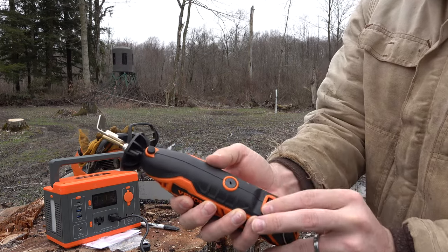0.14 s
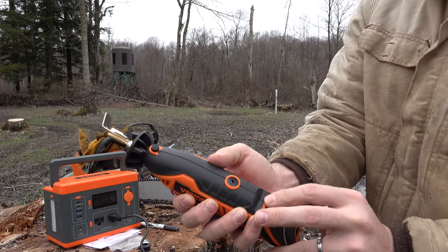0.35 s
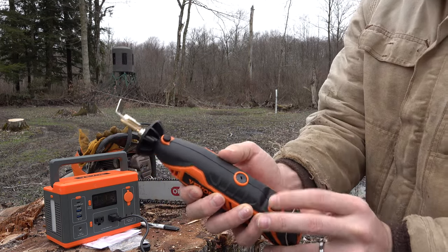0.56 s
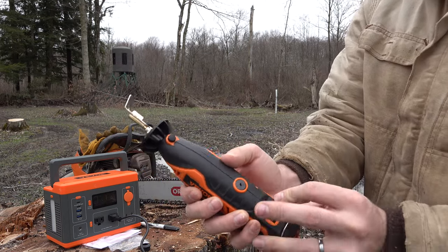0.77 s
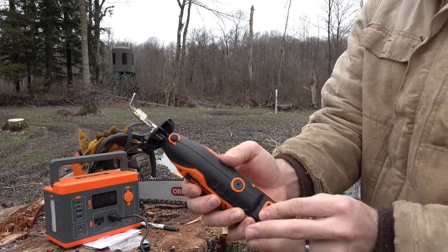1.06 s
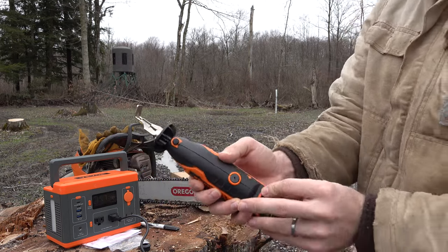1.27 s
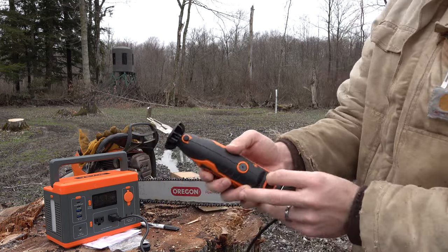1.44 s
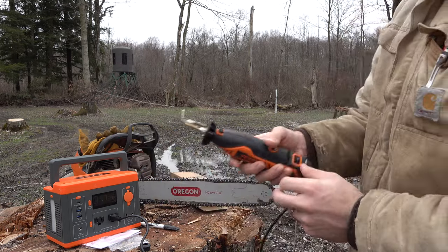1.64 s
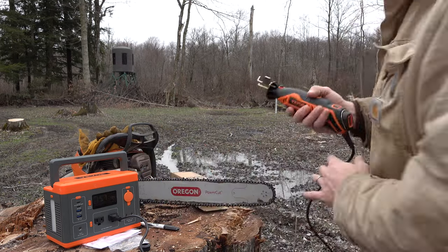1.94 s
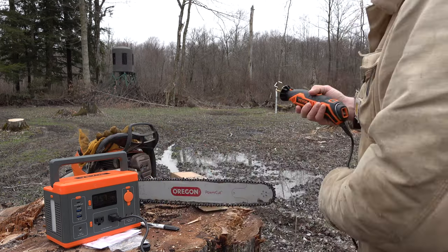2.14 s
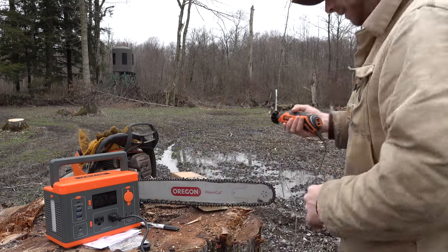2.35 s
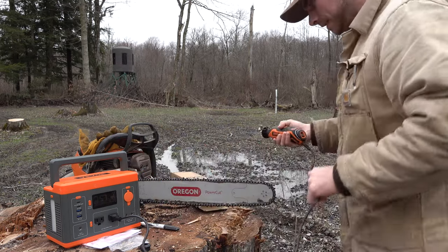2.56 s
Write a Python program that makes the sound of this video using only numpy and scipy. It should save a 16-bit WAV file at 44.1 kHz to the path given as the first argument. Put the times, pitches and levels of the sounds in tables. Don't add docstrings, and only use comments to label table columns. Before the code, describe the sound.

High motor whine and airy fan hiss from a handheld rotary tool; speed drops, turns rough and buzzy, then rises smoothly and thins as it is carried off in an open clearing, with light wind.

```python
import sys
import numpy as np
from scipy import signal
from scipy.fft import rfft, irfft, next_fast_len
from scipy.io import wavfile
from scipy.ndimage import uniform_filter1d, map_coordinates

SR = 44100
rng = np.random.default_rng(int(sys.argv[2]) if len(sys.argv) > 2 else 0)


def persist_wave(psi):
    counts = np.round(np.clip(psi, -1, 1) * 32767).astype(np.int16)
    wavfile.write(sys.argv[1], SR, np.atleast_2d(counts).T)


def amplitude_ratio(level_db):
    exponent = np.asarray(level_db, float) / 20
    return 10 ** exponent


N = 119070
TIME = np.arange(N) / SR
SIDES = np.array([[1], [-1]])

# [f/Hz, level/dB]
HUM = [(77.7, -49), (112, -65.5)]
# [f/Hz, level/dB]
RUMBLE = [(12, -53), (20, -6), (70, -13.5), (99, -15), (157, -16.5), (403, -12), (500, -6.5), (650, -19),
          (1100, -120)]
# [f/Hz, level/dB]
GUST = [(20, 2), (50, 8), (90, 5.5), (160, -15), (300, -24)]
# [f/Hz, level/dB]
PUFF = [(80, 14), (160, 9), (350, 16.5), (600, 8), (900, -50)]
# [t/s, level/dB]
CLICK = [
    (1.2445, -8),
]
# [f/Hz, level/dB, decay by 60 dB t/s]
CLICK_RING = [(5070, 3, 0.0069), (6930, 3, 0.0082), (7700, -8, 0.011), (10700, -8, 0.005),
              (13900, -12, 0.013)]

# [t/s, rotation/(turns/s)]
SPEED = [(0, 336), (.15, 306), (.3, 280.6), (.4, 265), (.44, 262), (.52, 261.4), (.755, 263.2), (.85, 284),
         (.95, 303.6), (1.15, 334.5), (1.3, 364.3), (1.45, 390.5), (1.55, 402.7), (1.7, 417), (1.85, 427.3),
         (2.05, 434.3), (2.4, 440.2), (2.7, 445.5)]
# [t/s, nearness/dB, current/dB, vents facing/dB, conducting share of each half wave/1]
MOTOR = [(0, -28.5, 0.5, -5, 0.45), (.15, -31.5, -1.5, -9, 0.5), (.3, -33.5, 1, -2, 0.41),
         (.42, -33.5, 9, 0, 0.38), (0.739, -36, 11.5, -2.5, 0.36), (0.798, -36, 7.5, 1, 0.56),
         (0.921, -35, 4.5, -7, 0.6), (1.05, -35.5, 4, -11.5, 0.66), (1.2, -32.5, 5, -10.5, 0.89),
         (1.35, -32.5, 1, -4, 0.76), (1.46, -30, 2, -13.5, 1), (1.549, -30.5, 3, -10, 0.8),
         (1.68, -29.5, -2.5, -1, .85), (1.85, -27, 2.5, -14.5, 0.9), (2.02, -30.5, -8, -3, 0.9),
         (2.2, -33, -8.5, 1, 1), (2.45, -32.5, -12, -3, 1), (2.7, -34.5, -12, -9, 0.7)]
# [t/s, extra delay/ms]
PATH = [(0, -1), (.28, -1), (.52, -1.9), (.64, -1.7), (.76, -1.4), (.88, -1), (1, -.4), (1.12, .3),
        (1.25, -.2), (1.6, 0), (1.85, .7), (2.08, 1.8), (2.7, 3)]
# [t/s, left over right level/dB]
BEARING = [(0, -1.5), (.6, -1.5), (1.4, -1.7), (1.6, -1.5), (1.85, -1.8), (2.7, -0.96)]
# [f/Hz, left over right level/dB]
LEAN = [(100, -.3), (500, 0.28), (1000, 1), (2000, -0.096), (4000, 0.88), (8000, -0.33), (14000, -2.2)]

# [f/Hz, level/dB]
FAN = [(150, -52), (250, -27.5), (610, -11), (1250, 5.5), (1700, -7), (2800, -10), (4200, -10),
       (6500, -14.5), (9500, -16), (15500, -21)]
# [t/s, hiss level/dB, vent cavity level/dB]
JET = [(0, 2, -3.5), (.15, 6, -20), (.45, 6, -16), (.75, 7, -17), (1, 6.5, -15), (1.25, 4.5, -7),
       (1.45, 5.5, -22), (1.65, 4, -6), (1.9, -0.5, -9), (2.05, 3, 5), (2.2, 5, 10), (2.4, 1.5, 7),
       (2.7, 5, 3)]
# [f/Hz, width/Hz, level/dB]
SHELL = [(2370, 135.5, 15), (2910, 250, 3.5), (3296, 175, -3)]
# [f/Hz, width/Hz, level/dB]
RINGS = [(291, 17, 9), (657, 47, 13.5), (1028, 166, 3.5), (1138, 85, 9.5), (1750, 230, 0), (2160, 33, 16.5),
         (4630, 49, -4), (5660, 410, -11.5), (6390, 66, 9.5)]
# [f/Hz, level/dB]
TONE_PATH = [(250, -9.5), (600, -8), (1000, 2.5), (2000, -6), (3650, -5), (4050, 10), (6000, 3.5),
             (15000, -5.5)]
# [multiple of the shaft/1, level/dB]
SHAFT = [(1, -6.5), (2, -1.5), (3, -3), (4, -2.5)]
# [multiple of the shaft/1, level/dB]
CAGE_TONES = [(3, -9), (5, -6.5)]
CAGE_SPIN = [-29, 3]
# [multiple of the shaft/1, level/dB]
BARS = [(23, -15), (24, -1.5), (28, -9), (29, 1.5), (30, -10), (31, 0), (32, 7.5), (33, 3.5), (34, 0),
        (35, -15), (36, 1), (37, -5), (44, -1), (47, 11.5), (48, 15.5), (49, -2), (51, -6), (54, -4),
        (25, -16), (27, -12), (41, -7), (43, -4), (45, 0), (46, -2), (50, -3), (52, -1), (53.6, -2),
             (39, -8), (40, -5), (55, -3)]
# [multiple of the shaft/1, level/dB]
SLOT_OVERTONES = [(16, 11), (24, 10.7), (32, 3.6)]
# [multiple of the shaft/1, level/dB]
WHINE = [(16, 18.5)]
# [t/s, level/dB]
BEAM = [(0, -2.5), (.1, -0.5), (.3, 3.5), (.45, -6.5), (.75, -5), (.92, -11.5), (1.05, 5), (1.2, 5),
        (1.33, 5.5), (1.45, 6), (1.54, 5.5), (1.65, -1.5), (1.78, 1), (1.9, 10), (2.1, -16.5), (2.3, -3.5),
        (2.7, 0)]
# [multiple of the shaft/1, peak level/dB, facing t/s, sweep width t/s]
LOBES = [(9, -40, 1.2, .3), (10, -35.5, 1.63, 0.29), (10, -36.5, 2.12, .15), (11, -38, 1.75, 0.14),
         (11, -39, 2.16, .3), (12, -29, 1.92, 0.1), (12, -35.5, 2.18, 0.13), (13, -29, 1.73, 0.052),
         (13, -35.5, 2.13, 0.33), (13, -39.5, 1.11, 0.18), (13, -34, 1.54, 0.048), (14, -34, .15, 0.27),
         (14, -38.5, 1.09, 0.37), (14, -30, 1.6, 0.11), (14, -31, 1.83, 0.088), (14, -32, 2.22, 0.29),
         (15, -29, 0.26, 0.28), (15, -33, 0.85, 0.49), (15, -28.5, 1.423, 0.042), (15, -30.5, 2.22, .2),
         (15, -41, 1.57, .5), (15, -38, 2.57, 0.23), (17, -22, 0.35, .12), (17, -25.5, 0.7, 0.22),
         (17, -27, 1.25, .12), (17, -35, 1.78, 0.28), (17, -28.5, 2.13, 0.07), (17, -38, 2.53, 0.26),
         (18, -33.5, .57, 0.29), (18, -37.5, 1.63, 0.44), (18, -44, 2.44, 0.32), (19, -38, .55, 0.29),
         (19, -42, 1.42, 0.15), (19, -41, 2.35, 0.7), (20, -49, 1.62, .1), (20, -39.5, 2.1, 0.32),
         (21, -46, 2.2, 0.25), (23, -41, 0.22, .15), (28, -45, 2.05, 0.33), (29, -40, 2.7, .3),
         (30, -41, 1.95, .2), (31, -34, 2.05, .3), (33, -42, 2.1, .4), (34, -54, 1.75, .3),
         (32, -34.5, 0.17, 0.16), (31, -35, 0.38, .08), (34, -42.5, .35, 0.075), (35, -40.5, 0.71, 0.16),
         (37, -39, 0.63, 0.093), (52, -45, .25, .15), (24, -36, 1.35, 0.086), (22, -49, 2.1, .3)]
# [f/Hz, level/dB]
MIC = [(150, 0), (9600, -2), (10600, -13), (11300, -22), (11900, -18), (12800, -16), (14300, -4),
       (15500, -11)]


def unit(x):
    return x / np.sqrt(np.mean(x ** 2) + 1e-20)


def along(points, hz):
    f, value = np.transpose(points)
    return np.interp(np.log(hz + 1), np.log(f + 1), value)


def course(table, column=1):
    columns = np.transpose(table)
    return np.interp(TIME, columns[0], columns[column])


def wobble(rate, count=1):
    knots = rng.standard_normal((count, 200))
    places = np.arange(0, N + 64, 64) * rate / SR
    return np.array([map_coordinates(k, [places]).repeat(64)[:N] for k in knots])


def filtered(x, response):
    m = next_fast_len(N + SR // 2)
    return irfft(rfft(x, m) * response(np.fft.rfftfreq(m, 1 / SR)), m)[..., :N]


def rush(spectrum, channels=1):
    noise = rng.standard_normal((channels, N))
    return unit(filtered(noise, lambda hz: amplitude_ratio(along(spectrum, hz))))


def resonance(f, centre, width):
    return 1j * f * width / (centre ** 2 - f * f + 1j * f * width)


def engine_hum():
    return sum(amplitude_ratio(db + 1 + 2.4 * wobble(5.22)[0]) * np.sin(2 * np.pi * hz * TIME + 0.24 * wobble(4.3)[0])
               for hz, db in HUM)


def wind():
    gust_s, rise_s, fall_s = 2.07, 0.24, 0.34
    swell = np.exp(-((TIME - gust_s) / np.where(TIME < gust_s, rise_s, fall_s)) ** 2)
    gust = amplitude_ratio(-42 + 1.2 * wobble(11.0)[0]) * (swell + 0.18) * rush(GUST)
    puff_s, puff_width_s = 2.66, 0.074
    puff = amplitude_ratio(-46) * np.exp(-((TIME - puff_s) / puff_width_s) ** 2) * rush(PUFF)
    return gust + puff


def clearing():
    middle, side = rush(RUMBLE, channels=2)
    return engine_hum() + wind() + amplitude_ratio(-56.5) * (middle + 0.26 * side * SIDES)


def scatter(x):
    t60_s = 0.24
    t = np.arange(SR // 4) / SR
    tail = rng.standard_normal((2, len(t))) * amplitude_ratio(-60 * t / t60_s)
    return signal.fftconvolve(x[None], tail / np.linalg.norm(tail[0]), axes=1)[:, :N]


def dial():
    out, t = np.zeros(N), np.arange(2000) / SR
    for s, db in CLICK:
        ring = sum(amplitude_ratio(level - 60 * t / t60) * np.sin(2 * np.pi * hz * t) for hz, level, t60 in CLICK_RING)
        scrape = .4 * amplitude_ratio(-60 * t / .004) * np.diff(rng.standard_normal(len(t) + 1))
        onset = np.minimum(t / .0004, 1)
        out[round(s * SR):][:len(t)] += amplitude_ratio(db - 3) * onset * (ring + scrape)
    return filtered(out, lambda hz: hz ** 4 / (hz ** 4 + 3000 ** 4))


def shell(f):
    modes = sum(amplitude_ratio(db) * c * w / (c * c - f * f + 1j * f * w) for c, w, db in SHELL)
    return modes - 1 / (1 + (f / 3300) ** 8)


def housing(f):
    return amplitude_ratio(along(TONE_PATH, f)) * (1 + sum(amplitude_ratio(db) * resonance(f, c, w) for c, w, db in RINGS))


def mains_current():
    half_wave_hz, zero_s = 120.1, .0073
    uneven, rise, peaky = 0.11, 0.071, 1.97
    kick, kick_life = 0.49, 0.014
    share = np.clip(course(MOTOR, 4), .1, 1)
    wave = (TIME - zero_s - course(PATH) / 1000) * half_wave_hz
    left = 1 - wave % 1
    since = share - left
    burst = np.abs(np.sin(np.pi * left)) ** peaky * np.clip(since / rise, 0, 1)
    burst = unit(burst * (1 + uneven * (-1) ** np.floor(wave)))
    jolt = kick * (since > 0) * np.exp(-np.abs(since) / kick_life) * np.sin(np.pi * share) ** 2
    return burst, amplitude_ratio(course(MOTOR, 2)) * (burst + jolt)


def patchy(x):
    z = signal.stft(x, nperseg=512)[2]
    field = uniform_filter1d(rng.standard_normal(z.shape), 8, 0)
    field = uniform_filter1d(field, 14, 1)
    return signal.istft(z * amplitude_ratio(1.3 * unit(field)), nperseg=512)[1][:N]


def fan(turns, octaves, burst):
    bright_db = 2.6
    gate, turn_depth = 0.072, 0.11
    level_db = course(MOTOR, 1) + 1
    air = unit(patchy(rush(FAN)[0]))
    high = filtered(air, lambda hz: hz ** 2 / (hz ** 2 + 2500 ** 2))
    hiss_db = bright_db * octaves + course(JET, 1) + 1.5 * wobble(14)[0]
    air = air + (amplitude_ratio(hiss_db) - 1) * high
    air = air + amplitude_ratio(course(JET, 2)) * filtered(high, lambda f: resonance(f, 6000, 1500))
    air = air * (1 + gate * (burst - 1)) * (1 + turn_depth * np.sin(2 * np.pi * turns))
    air = air + amplitude_ratio(-18.5) * filtered(air, shell)
    swirl = amplitude_ratio(level_db - 20) * rush(FAN) * SIDES
    return amplitude_ratio(level_db + 0.18 * wobble(8.5)[0]) * air, swirl


def lobes(turns):
    start = rng.random(60)
    return sum(amplitude_ratio(db) * np.exp(-((TIME - s) / wide) ** 2) * np.sin(2 * np.pi * (round(k) * turns + start[round(k)]))
               for k, db, s, wide in LOBES)


def partials(table, turns, speed, flutter_db=2, above=0):
    drift, start = wobble(5, count=len(table)), rng.random(len(table))
    total = 0
    for (k, db), d, p in zip(table, drift, start):
        audible = k * speed < SR / 2.2
        total = total + amplitude_ratio(db + flutter_db * d) * audible * np.sin(2 * np.pi * ((round(k) + above) * turns + p))
    return total


def shaft_tones(turns, speed, octaves):
    near_db = course(MOTOR, 1)
    rattle = amplitude_ratio(3 * wobble(30.27)[0])
    tones = rattle * partials(SHAFT, turns, speed)
    for row, spin_db in zip(CAGE_TONES, CAGE_SPIN):
        tones = tones + amplitude_ratio(spin_db * octaves) * partials([row], turns, speed, above=.44)
    return amplitude_ratio(8 * octaves + near_db - near_db.mean()) * tones


def bar_tones(turns, speed, pull):
    vents_db = course(MOTOR, 3)
    bars = amplitude_ratio(vents_db) * partials(BARS, turns, speed, flutter_db=2.5)
    overtones = amplitude_ratio(-12.5) * pull * partials(SLOT_OVERTONES, turns, speed)
    whine = amplitude_ratio(vents_db + course(BEAM)) * partials(WHINE, turns, speed, flutter_db=3.5)
    return bars + overtones + whine


def grinder():
    speed = course(SPEED)
    turns, octaves = np.cumsum(speed) / SR, np.log2(speed / 350)
    burst, pull = mains_current()
    air, swirl = fan(turns, octaves, burst)
    slots = amplitude_ratio(18.5) * pull * np.sin(16 * np.pi * turns)
    steady = shaft_tones(turns, speed, octaves) + bar_tones(turns, speed, pull)
    tones = amplitude_ratio(-44) * (filtered(slots, shell) + filtered(steady, housing))
    return tones + lobes(turns) + air, swirl


def scene():
    motor, swirl = grinder()
    tool = motor + dial()
    near = filtered(tool, lambda hz: amplitude_ratio(along(LEAN, hz) * SIDES / 2))
    near = near * amplitude_ratio(course(BEARING) * SIDES / 2)
    return near + amplitude_ratio(-54) * scatter(tool) + swirl + clearing()


def top_cut(x):
    return signal.sosfilt(signal.butter(12, 15640, fs=SR, output="sos"), x)


def record(dry):
    mix = filtered(dry, lambda hz: amplitude_ratio(along(MIC, hz)))
    return top_cut(mix)


dry = scene()
out = record(dry)
persist_wave(out)
```